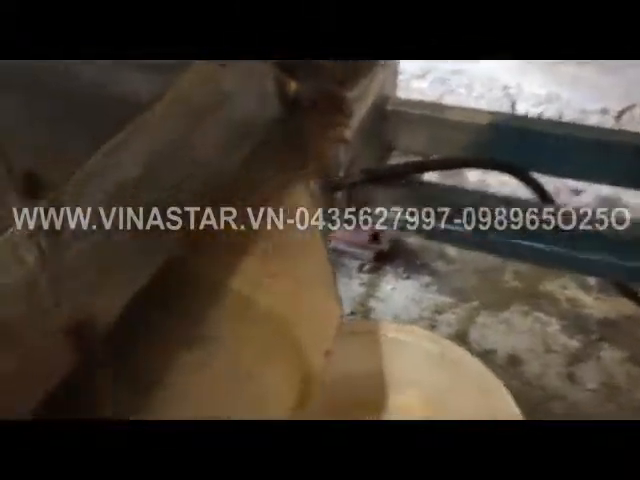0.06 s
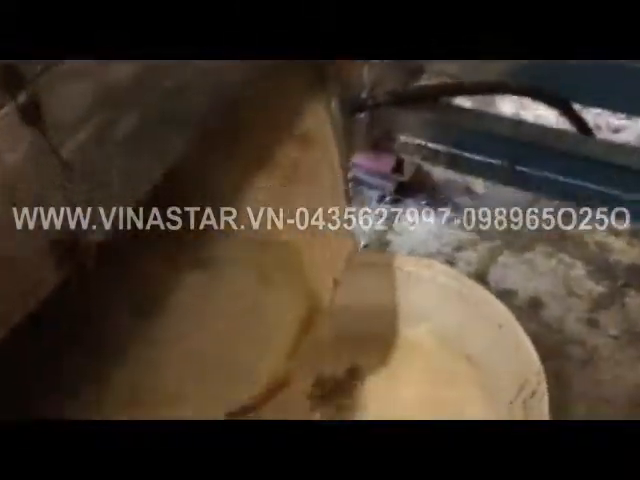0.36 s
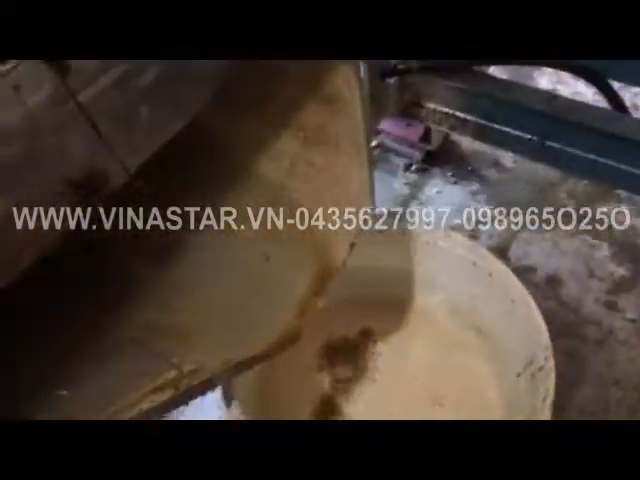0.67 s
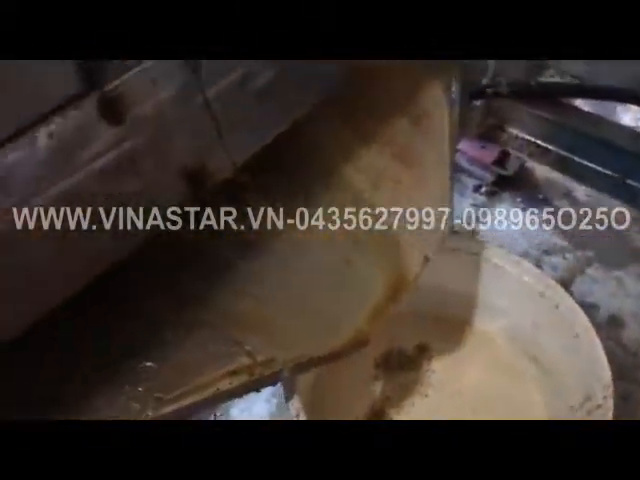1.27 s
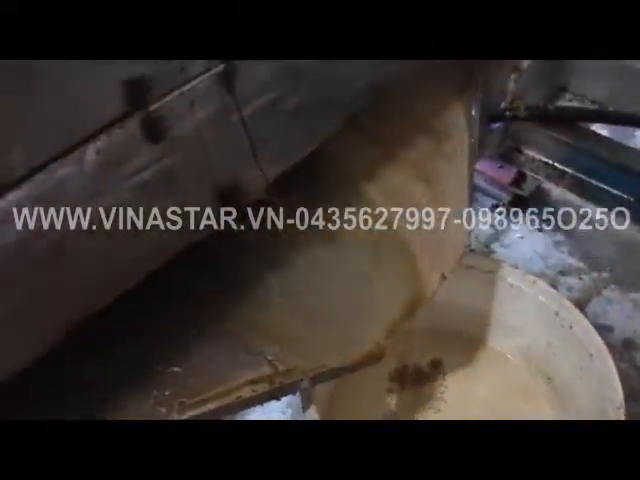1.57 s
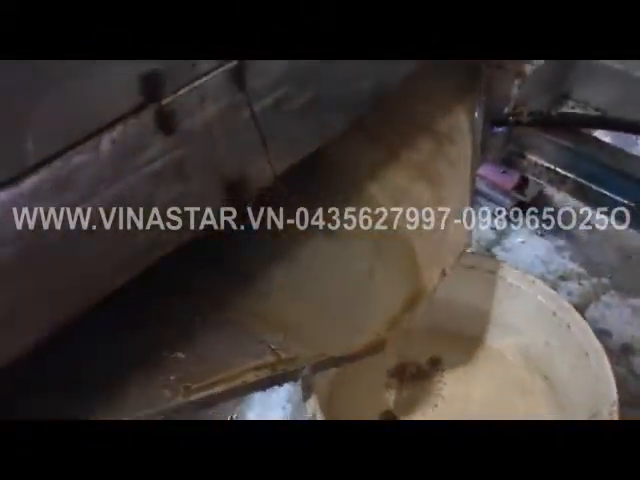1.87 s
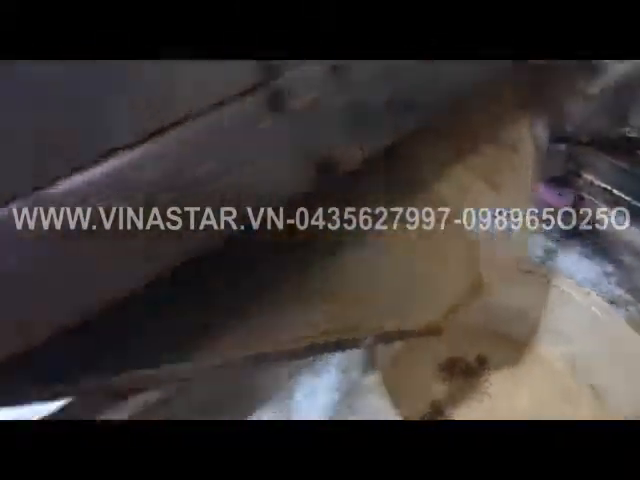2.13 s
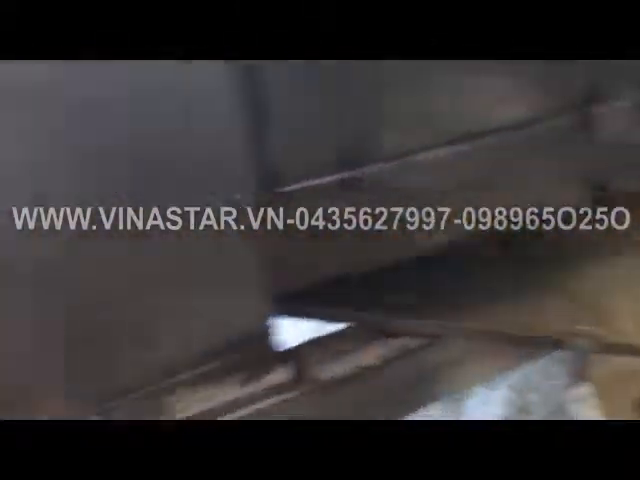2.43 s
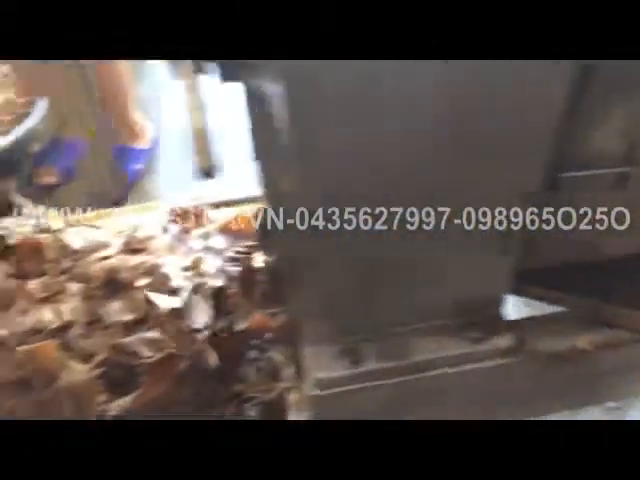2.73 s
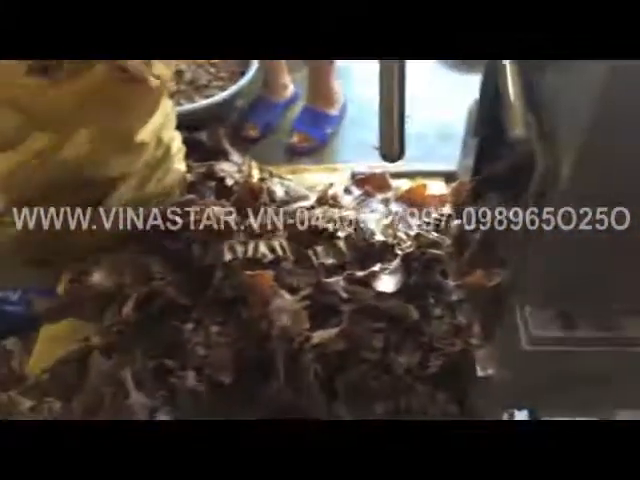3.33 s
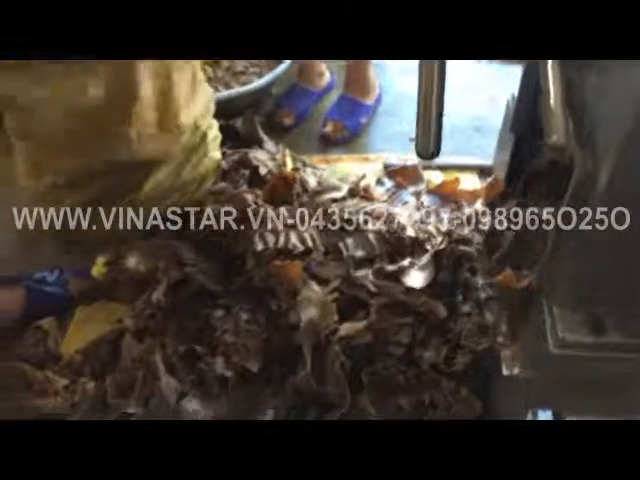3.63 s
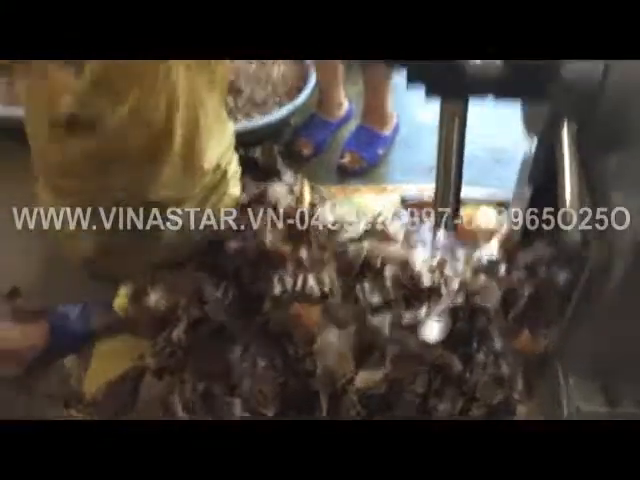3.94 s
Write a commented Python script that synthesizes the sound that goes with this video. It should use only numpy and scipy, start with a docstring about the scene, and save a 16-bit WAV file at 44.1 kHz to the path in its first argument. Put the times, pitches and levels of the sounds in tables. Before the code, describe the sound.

An oil press runs with a throbbing gear whine, motor hum and light crackling.

```python
"""Screw oil press in a workshop

Meshing gears whine, modulated at the shaft rate, over motor hum, thin bearing tones and the
broadband churn of the screw. Pressed cake sizzles, rustles and cracks; hard bits ring the chute.
Around 2.4 s the hand-held microphone moves from the oil spout round to the cake outlet:
the whine falls away, the rumble grows and soft handling bumps come through."""
import sys
import numpy as np
from scipy import signal
from scipy.fft import rfft, irfft
from scipy.io import wavfile

SR = 44100
rng = np.random.default_rng(int(sys.argv[2]) if len(sys.argv) > 2 else 0)


def log_audio(samples):
    """Write samples as a 16-bit WAV file to the path given in sys.argv[1]."""
    # one column per channel
    frames = np.atleast_2d(samples).T
    # limit to full scale, then quantise
    limited = np.clip(frames, -1, 1)
    pcm = np.round(limited * 32767).astype(np.int16)
    wavfile.write(sys.argv[1], SR, pcm)


N = 176400

MESH_HZ, SHAFT_HZ = 872.9, 25.17
SPEED_WANDER = 0.00025  # share of the drive speed
T = np.arange(N) / SR


def from_db(db):
    """Decibels to gain."""
    return 10 ** (np.asarray(db) / 20)


def rms_one(x):
    """Scale to an rms of 1."""
    return x / np.sqrt(np.mean(x ** 2) + 1e-20)


def in_time(rows):
    """Each column of a curve at every sample."""
    s, *columns = np.transpose(rows)
    return [np.interp(T, s, c) for c in columns]


def drift(rate):
    """Random fluctuation: Gaussian noise low-passed at rate hertz, rms 1."""
    r = np.exp(-80 * np.pi * rate / SR)
    slow = signal.lfilter([1], [1, -2 * r, r * r], rng.standard_normal(N // 40 + 2002))[2000:]
    return np.interp(np.arange(N) / 40, np.arange(len(slow)), rms_one(slow))


def band(x, low_hz, high_hz):
    """Gentle band-pass."""
    return signal.sosfilt(
        signal.butter(2, [low_hz, min(high_hz, SR / 2 - 2000)], "band", fs=SR, output="sos"), x)


def coloured(x, hz, db):
    """Give a steady sound a spectrum."""
    f = np.maximum(np.fft.rfftfreq(N, 1 / SR), 1)
    return irfft(rfft(x) * from_db(np.interp(np.log(f), np.log(hz), db)), N)


def tone(hz, clock, waver):
    """A sinusoid of rms about 1; a random share, waver, modulates its amplitude and phase."""
    phasor = 1 + waver * (drift(2.5) + 1j * drift(2.5)) / np.sqrt(2)
    return np.sqrt(2) * np.real(phasor * np.exp(2j * np.pi * (hz * clock + rng.random())))


def grains(spectrum, per_s=5400, spread_db=3.0):
    """Shot noise: dense tiny clicks of uneven size, rms 1."""
    sizes = from_db(spread_db * np.minimum(rng.exponential(1, N), 5)) * rng.choice([-1, 1], N)
    clicks = sizes * (rng.random(N) < per_s / SR)
    hz, db = np.transpose(spectrum)
    return rms_one(band(coloured(clicks, hz, db), hz[0], SR / 2))


# Noise density of screw and room: frequency_hz, spout_db_per_hz, outlet_db_per_hz
CHURN_SPECTRUM = [(25, -71, -64.5), (45, -60.5, -57.5), (82, -61.5, -60), (127, -60.5, -55),
                  (171, -53, -58), (260, -62.5, -68), (347, -67, -61.5), (453, -57, -66.5),
                  (568, -63.5, -62.5), (656, -69, -71), (887, -62, -60.5), (1170, -71.5, -69.5),
                  (1820, -75.5, -75.5), (2260, -79, -77.5), (2920, -79, -77.5), (4080, -84, -82.5),
                  (7100, -91, -91), (10900, -96.5, -101.5)]

def screw_churn(position, flicker_db=1.32):
    """Grinding makes broadband noise; each octave fluctuates independently."""
    white, bin_hz = rfft(rng.standard_normal(N)), np.fft.rfftfreq(N, 1 / SR)
    noise = 0
    for low_hz in 20 * 2 ** np.arange(10):
        octave = irfft(white * (bin_hz >= low_hz) * (bin_hz < 2 * low_hz), N)
        noise += octave * from_db(flicker_db * drift(11.2))
    noise = rms_one(noise) * np.sqrt(SR / 2)  # about unit power per hertz
    hz, spout_db, outlet_db = np.transpose(CHURN_SPECTRUM)
    return (1 - position) * coloured(noise, hz, spout_db) + position * coloured(noise, hz, outlet_db)


# Partials of the motor: pitch_hz, spout_db, outlet_db
HUM_PARTIALS = [(74.6, -41, -38.5), (86, -46, -48), (146, -45, -43), (167, -43, -45), (226, -45, -52),
                (301.4, -49, -48), (403, -50, -50), (447, -45, -53), (522.2, -44, -54), (548, -52, -47),
                (647, -53, -55), (698, -57, -52), (1049, -56, -51), (1149.2, -45.5, -48)]

def motor_hum(position, clock):
    """Rotation gives a line spectrum whose frequencies follow the drive speed."""
    return sum(from_db(spout_db + position * (outlet_db - spout_db)) * tone(hz, clock, waver=0.37)
               for hz, spout_db, outlet_db in HUM_PARTIALS)


def whistle(hz, clock, waver, slip_share=0.000556):
    """Slip against the drive slightly modulates the frequency of a bearing tone; rms 1."""
    slip_s = slip_share * np.cumsum(drift(15)) / SR
    return rms_one(tone(hz, clock + slip_s, waver))


# Faint bearing whistles: pitch_hz, spout_db, outlet_db
BEARING_WHISTLES = [(1741, -59, -61), (1840.5, -60, -60), (2787, -62, -62), (6243, -71, -73),
                    (7117, -70, -72), (7333, -71, -73), (7779, -71, -73), (9705, -71, -73)]
# Levels of the three squeals: time_s, first_db, second_db, third_db
SQUEAL_ENVELOPES = [(0, -58, -54, -62), (.2, -50, -67, -58), (.42, -49.5, -69, -57), (.63, -59, -62, -60.5),
                    (.83, -49, -62, -63.5), (1.02, -55, -50.5, -60), (1.35, -56, -63, -61),
                    (1.75, -54, -58, -61), (2.05, -59, -51, -65), (2.3, -66, -56, -78),
                    (2.52, -52, -57, -70), (2.9, -66, -54, -72), (3.12, -54, -69, -72),
                    (3.27, -66, -52.5, -57), (3.52, -54, -57, -64), (3.78, -50, -64, -67),
                    (4, -65, -63, -69)]
SQUEAL_HZ = (2588, 2688, 5276.5)

def bearings(position, clock):
    """Bearings radiate narrow spectral lines: three squeals come and go over fainter whistles."""
    out = np.zeros(N)
    for hz, level_db in zip(SQUEAL_HZ, in_time(SQUEAL_ENVELOPES)):
        out += from_db(level_db) * whistle(hz, clock, waver=0.14)
    for hz, spout_db, outlet_db in BEARING_WHISTLES:
        out += from_db(spout_db + position * (outlet_db - spout_db)) * whistle(hz, clock, waver=0.57)
    return out


# Thuds of the hand on the microphone: start_s, level_db, pitch_hz, t60_s
HAND_BUMPS = [(2.595, -27, 75, 0.083), (2.895, -21.5, 75, 0.17), (2.965, -23, 103, 0.23),
              (3.029, -23, 80.4, 0.11), (3.08, -26, 137, 0.083), (3.254, -15.5, 100, 0.067),
              (3.277, -21, 189, 0.078), (3.309, -22, 150, .06), (3.389, -22.5, 90, 0.093),
              (3.71, -19.5, 171, 0.093), (3.882, -11.5, 87, 0.033)]

def handling_bumps(attack_s=0.0026, rub_share=0.39):
    """Structure-borne sound: the hand excites damped vibration of the case, with dull rubbing."""
    out = np.zeros(N)
    rub = rms_one(band(rng.standard_normal(N), 116, 254))
    for start_s, level_db, hz, t60_s in HAND_BUMPS:
        age = np.clip(T - start_s, 0, 1)
        decay_db = 60 * np.maximum(age - attack_s, 0) / t60_s
        envelope = np.minimum(age / attack_s, 1) * from_db(level_db - decay_db)
        out += envelope * (np.sin(2 * np.pi * hz * age) + rub_share * rub)
    return out


# Envelope of the sizzle: time_s, level_db
SIZZLE_ENVELOPE = [(0, -72), (.55, -62), (.7, -59), (.88, -45.5), (1.05, -53), (1.15, -50.5), (1.4, -45.5),
                   (1.9, -47), (2.2, -55), (2.38, -48), (2.47, -41), (2.54, -52.5), (2.68, -47.5),
                   (2.78, -52), (2.9, -47), (3.15, -49), (3.4, -52.5), (3.62, -40.5), (3.72, -53),
                   (3.9, -54), (4, -46)]
# Spectrum of its grains: frequency_hz, relative_db
SIZZLE_SPECTRUM = [(1500, 5), (3000, 1.5), (5000, 1), (7500, -1.5), (10500, -3.5)]

def cake_sizzle(pops_per_s=33, pop_db=3.5, pop_t60_s=0.021, flicker_db=2.25):
    """Random impulses from the pressed cake merge into hiss; sparser pops decay exponentially."""
    level_db, = in_time(SIZZLE_ENVELOPE)
    pops = (rng.random(N) < pops_per_s / SR) * rng.uniform(0.44, 1, N)
    pop_envelope = signal.lfilter([1], [1, -from_db(-60 / (pop_t60_s * SR))], pops + 1e-18)
    crackle = pop_envelope * rms_one(band(rng.standard_normal(N), 4000, 11000))
    envelope = from_db(level_db + flicker_db * drift(4.8))
    return envelope * (grains(SIZZLE_SPECTRUM) + from_db(pop_db) * crackle)


# Slides of cake flakes: start_s, level_db, attack_s, fall_30_db_s
FLAKE_SLIDES = [(.6, -37, 0.12, 0.57), (1.18, -41.5, 0.022, 0.08), (1.67, -40, 0.024, 0.092),
                (3.588, -36, 0.033, 0.066)]
# Spectrum of their rustle: frequency_hz, relative_db
RUSTLE_SPECTRUM = [(1200, -8), (2200, 4), (3800, -0.5), (6000, -5.5), (10500, -15)]

def cake_rustle():
    """Friction of sliding flakes makes granular noise that swells and dies away."""
    envelope = np.zeros(N)
    for start_s, level_db, attack_s, fall_s in FLAKE_SLIDES:
        age = T - start_s
        decay_db = 30 * np.maximum(age - attack_s, 0) / fall_s
        envelope += np.clip(age / attack_s, 0, 1) * from_db(level_db - decay_db)
    return envelope * grains(RUSTLE_SPECTRUM)


# Spits and cracks of the cake: start_s, level_db, centre_hz, width_octaves, t60_s
CAKE_CRACKS = [(0.0155, -32.5, 7100, 0.97, 0.049), (0.02, -37, 3570, 0.43, 0.06),
               (.135, -48, 7500, .8, .04), (.176, -48, 7600, .6, .05), (0.252, -27, 6760, 0.81, 0.05),
               (0.347, -35.5, 5000, 1.2, 0.045), (0.4199, -25.5, 7100, 0.71, 0.044),
               (0.422, -35.5, 3650, .4, .045), (0.644, -34.5, 2290, 0.35, 0.057),
               (.695, -39, 7400, 0.64, 0.045), (.714, -36, 2280, 0.4, 0.03), (.741, -44, 3700, 0.53, 0.08),
               (1.401, -41, 7000, 0.92, 0.097), (1.605, -42, 5600, .6, .04), (1.777, -41, 8100, 0.96, .04),
               (1.812, -36.5, 7600, 2.1, 0.035), (2.122, -38, 3400, 1.2, 0.03),
               (2.574, -32.5, 6500, 1.9, 0.031), (2.838, -38.5, 3800, .7, .035),
               (3.553, -40, 7540, 0.72, 0.016), (3.612, -36, 1900, .7, .08), (3.633, -38, 4200, .7, 0.037),
               (3.91, -39, 6250, 0.34, 0.021)]

def cake_cracks(attack_s=0.0019, tail_db=-26.5, tail_t60_s=0.27):
    """Each fracture is a burst of band-limited noise with a faint tail of room reverberation."""
    out = np.zeros(N)
    for start_s, level_db, hz, octaves, t60_s in CAKE_CRACKS:
        age = np.clip(T - start_s, 0, 1)
        since_peak = np.maximum(age - attack_s, 0)
        direct = from_db(-60 * since_peak / t60_s)
        tail = from_db(tail_db - 60 * since_peak / tail_t60_s)
        envelope = np.minimum(age / attack_s, 1) * (direct + tail)
        b, a = signal.iirpeak(hz, 1 / octaves / np.log(2), fs=SR)
        noise = signal.lfilter(b, a, signal.lfilter(b, a, rng.standard_normal(N)))
        out += from_db(level_db) * envelope * rms_one(noise)
    return out


# Hard bits of cake hitting the chute: start_s, peak_db, pitch_hz, width_hz
CHUTE_IMPACTS = [(2.121, -30.5, 2670, 260), (2.574, -21.5, 3060, 560), (3.033, -20.5, 1950, 1150)]

def chute_knocks():
    """Each impact gives the impulse response of a damped resonance of the steel chute."""
    out = np.zeros(N)
    for start_s, peak_db, hz, width_hz in CHUTE_IMPACTS:
        impulse = (np.arange(N) == int(start_s * SR)) + 1e-18 * rng.standard_normal(N)
        b, a = signal.iirpeak(hz, hz / width_hz, fs=SR)
        ring = signal.lfilter(b, a, signal.lfilter(b, a, impulse))
        out += from_db(peak_db) * ring / np.abs(ring).max()
    return out


# Main gear tones at the microphone: time_s, lower_sideband_db, mesh_db, upper_sideband_db
GEAR_ENVELOPES = [(0, -29, -27, -26.5), (.14, -34.5, -23.7, -25), (.3, -45, -23, -31.5),
                  (.47, -34.5, -22, -29.5), (.72, -33, -23.7, -31), (.98, -35.5, -26, -27.5),
                  (1.25, -30.5, -24.5, -30), (1.55, -31, -23.5, -31), (1.87, -31.5, -27.5, -28),
                  (2.1, -35.5, -26.5, -29.5), (2.28, -34, -26.2, -26), (2.42, -53, -27.8, -27.5),
                  (2.53, -43, -30, -36.5), (2.65, -32, -33, -44), (2.85, -33, -37.5, -36),
                  (3.04, -37.5, -42, -37.5), (3.2, -34, -34.5, -40), (3.29, -36, -35, -41),
                  (3.38, -41, -34, -33.5), (3.56, -37, -32.5, -37.5), (3.8, -40, -34.5, -37.5),
                  (4, -46, -31.5, -40)]
# Weaker sidebands: offset_shaft_orders, spout_db, outlet_db
WEAK_SIDEBANDS = [(-2, -46.5, -54), (1, -57, -45), (2, -39.5, -50), (4, -58, -48)]

def gear_whine(clock, roughness_db=0.65):
    """The tooth-mesh tone beats with sidebands spaced by the shaft rate, so the whine throbs."""
    out = np.zeros(N)
    for order, level_db in zip((-1, 0, 3), in_time(GEAR_ENVELOPES)):
        out += from_db(level_db) * tone(MESH_HZ + order * SHAFT_HZ, clock, waver=0.035)
    turned = np.interp(T, (1.8, 2.1), (0, 1))  # the microphone rounds the corner
    for order, spout_db, outlet_db in WEAK_SIDEBANDS:
        level_db = spout_db + turned * (outlet_db - spout_db)
        out += from_db(level_db) * tone(MESH_HZ + order * SHAFT_HZ, clock, waver=0.44)
    return out * from_db(roughness_db * drift(43))


# Path of the microphone: time_s, position (0 at the oil spout, 1 at the cake outlet)
MICROPHONE_PATH = [(0, 0.082), (1.85, 0.24), (2.3, 0.71), (2.7, 0.96), (4, 0.57)]

def scene():
    """Superposition of all sources at the moving microphone, in mono."""
    position, = in_time(MICROPHONE_PATH)
    clock = T + SPEED_WANDER * np.cumsum(drift(2.8)) / SR  # time as the drive keeps it
    background = screw_churn(position) + motor_hum(position, clock) + bearings(position, clock)
    bumps = handling_bumps()
    cake = cake_sizzle() + cake_rustle() + cake_cracks() + chute_knocks()
    return (background + bumps + cake + gear_whine(clock))[None]


def record(dry):
    """Band limiting: the microphone loses the deepest bass, and the top is cut steeply."""
    low_cut = signal.butter(2, 56, "high", fs=SR, output="sos")
    high_cut = signal.ellip(12, .1, 80, 10300, fs=SR, output="sos")
    return signal.sosfilt(high_cut, signal.sosfilt(low_cut, dry))


dry = scene()
out = record(dry)
log_audio(out)
```